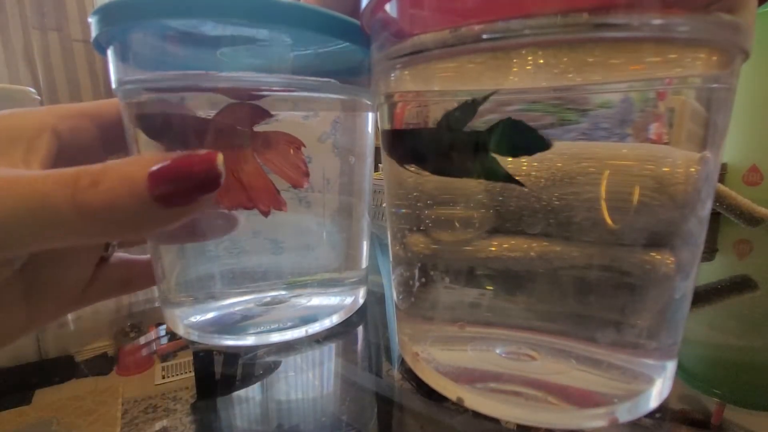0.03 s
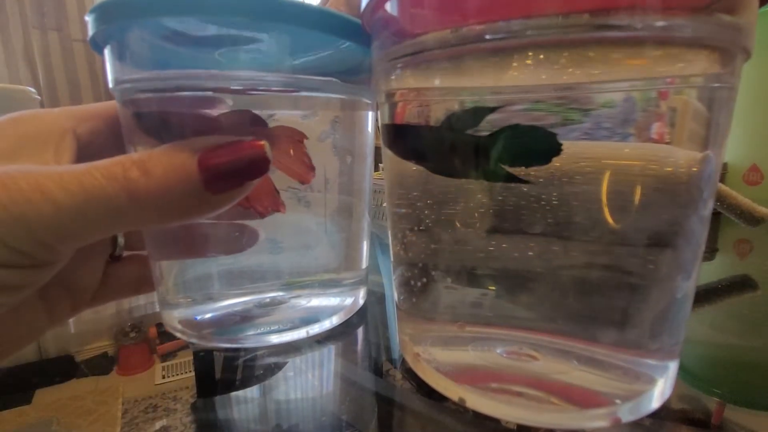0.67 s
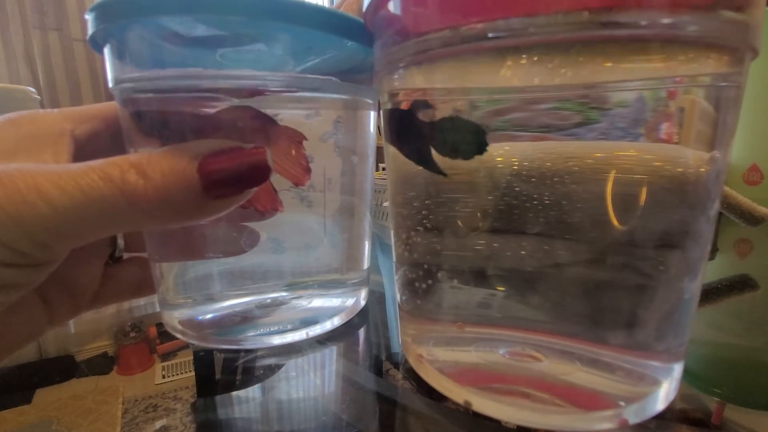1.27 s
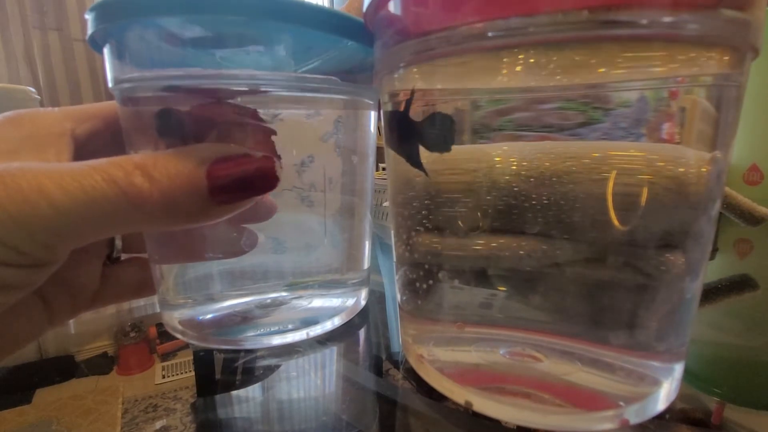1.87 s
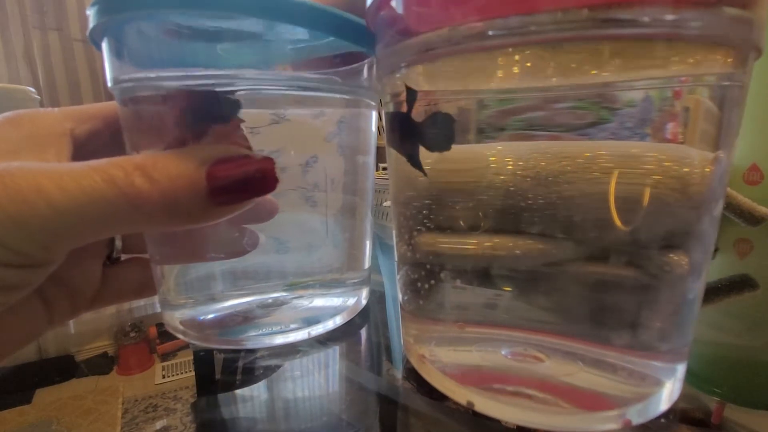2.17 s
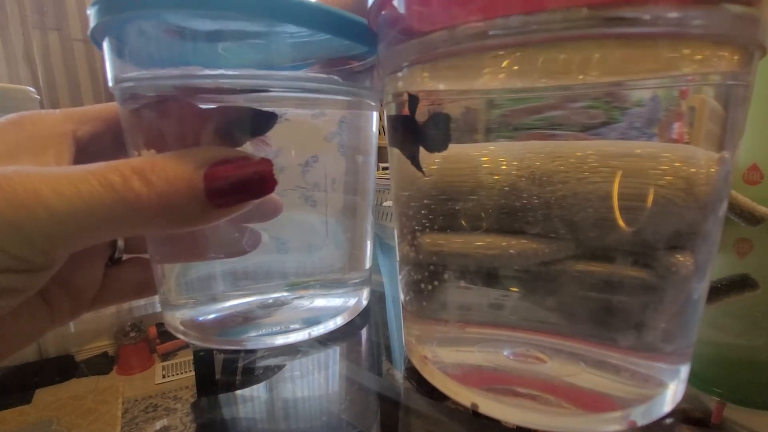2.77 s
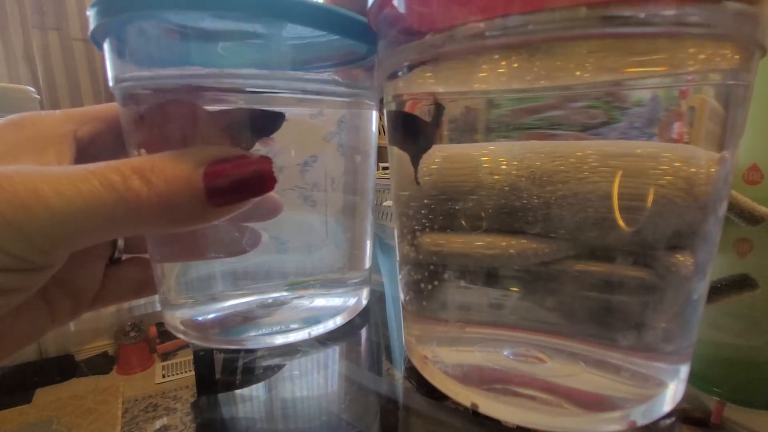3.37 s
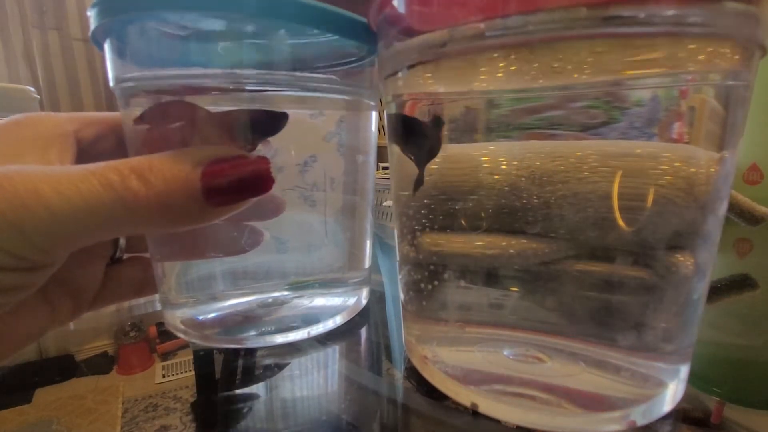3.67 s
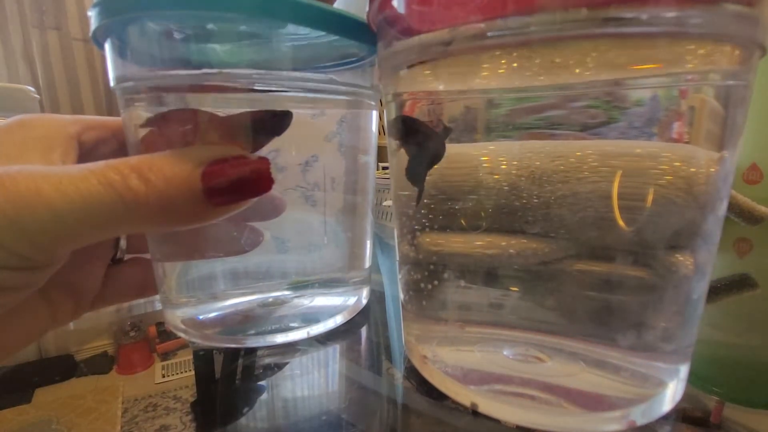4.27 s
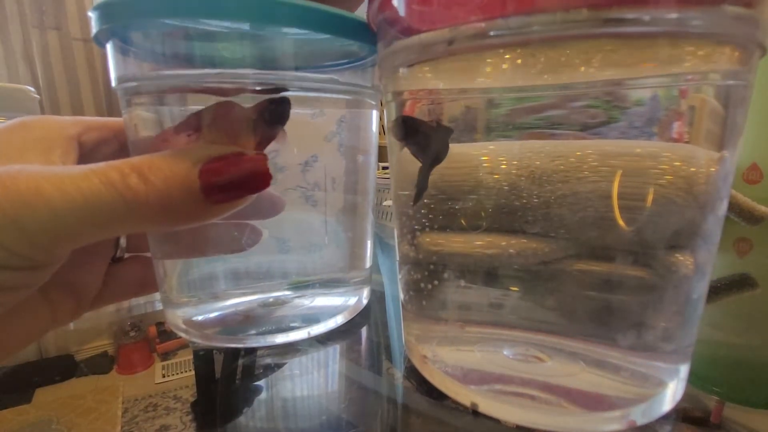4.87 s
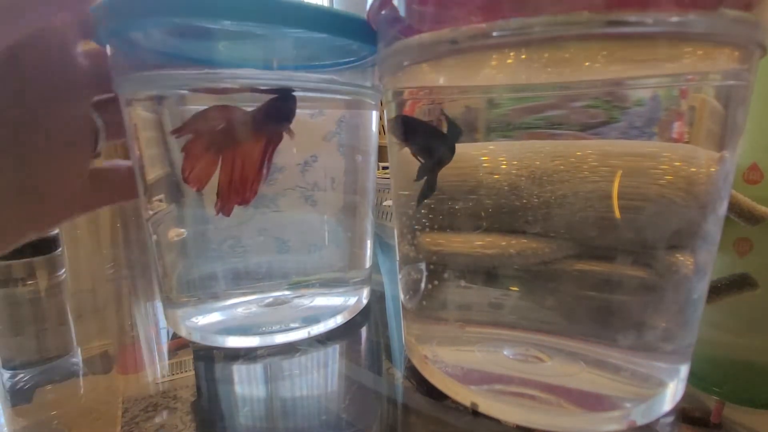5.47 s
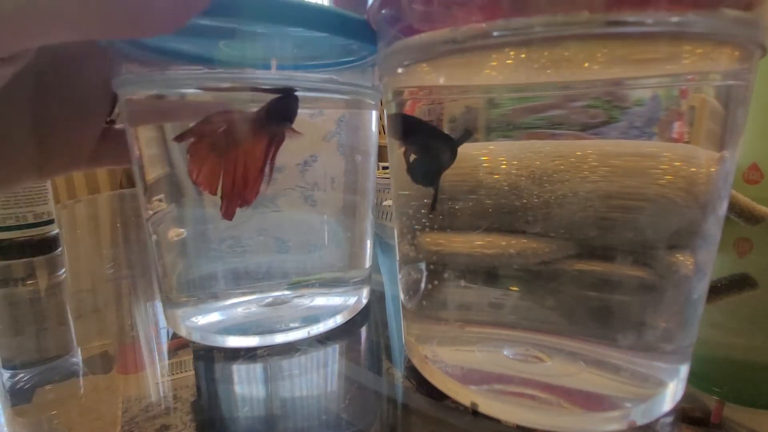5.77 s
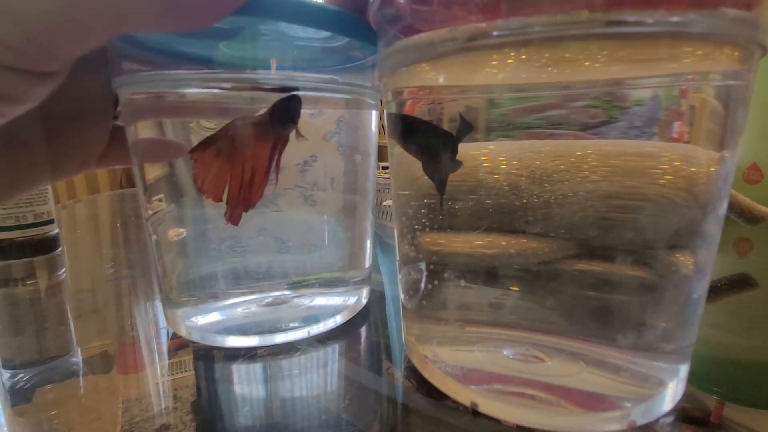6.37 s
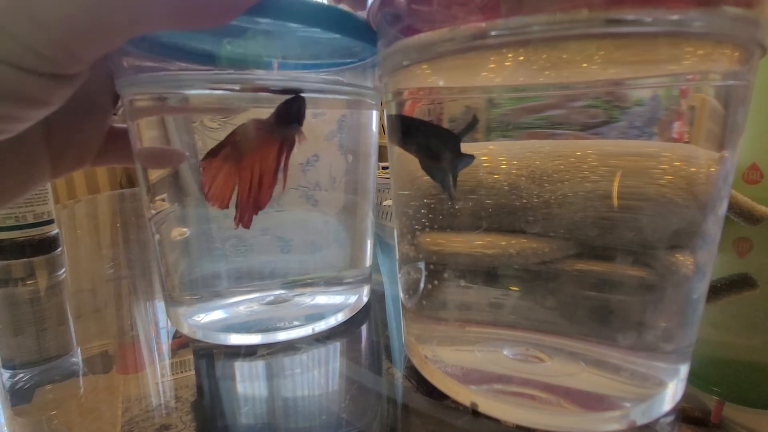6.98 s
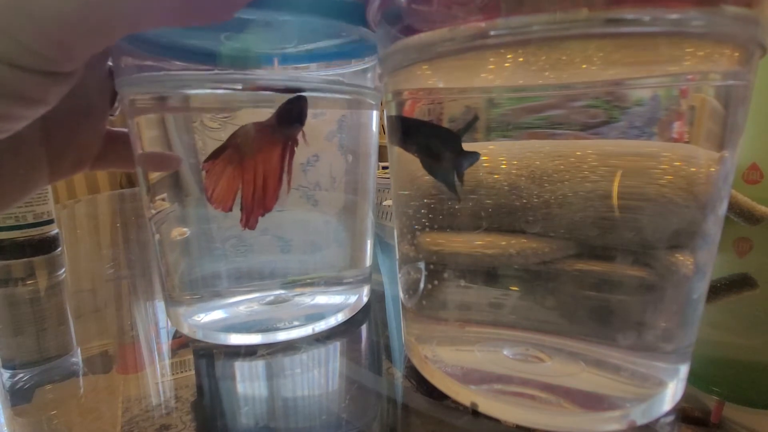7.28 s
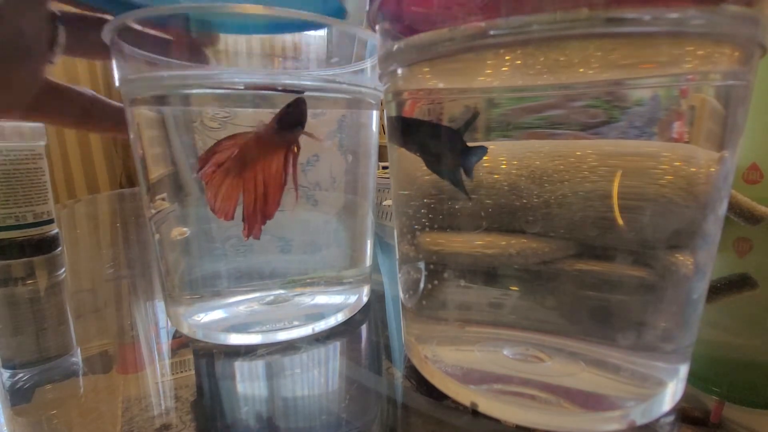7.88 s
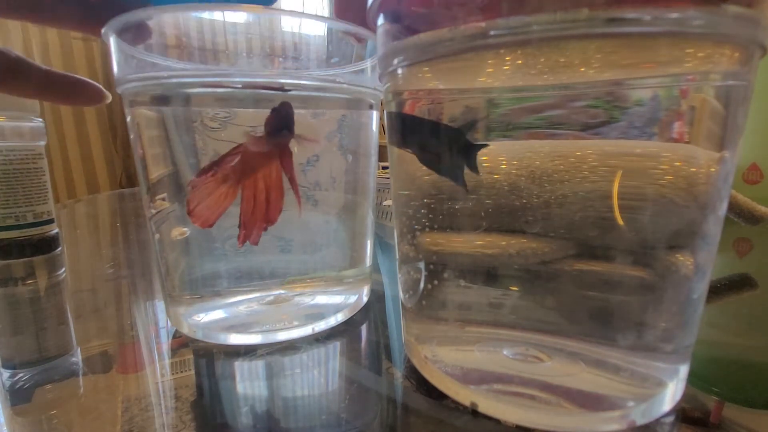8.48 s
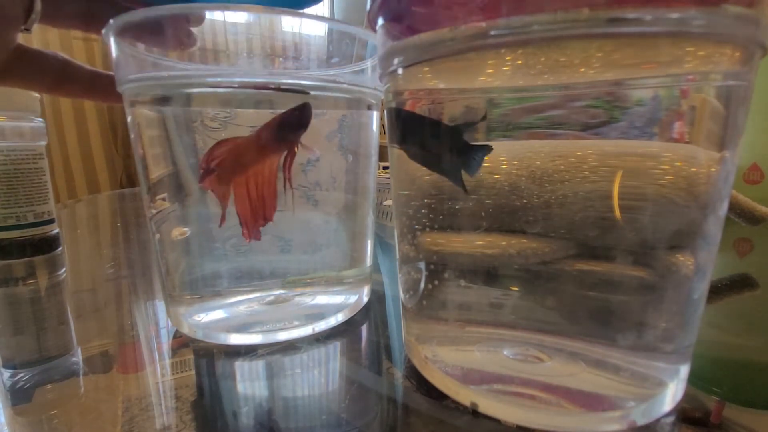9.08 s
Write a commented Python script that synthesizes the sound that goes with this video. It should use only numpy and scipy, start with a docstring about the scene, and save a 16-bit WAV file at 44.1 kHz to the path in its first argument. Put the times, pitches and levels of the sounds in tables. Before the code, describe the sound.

Soft hand rustle and a low hum, with one sharp clatter of a plastic cup on glass and light taps and hollow tocks afterward.

```python
"""Soft strokes of hand and sleeve over a steady electrical hum, with faint fingertip scuffs and squeaks.
The hand shifts a water-filled plastic cup on a glass tabletop in a small room, close to a phone.
At 2 s the cup knocks down on its edge and clatters flat, ringing its modes and the table's;
at 4.4 s it judders once. Nails and lid tick, the water-backed wall flexes in hollow tocks.
The rustle drops as the hand lets go near 6 s; then fingers rub the lid loose."""
import sys
import numpy as np
from scipy import signal
from scipy.fft import rfft, irfft, next_fast_len
from scipy.io import wavfile
from scipy.ndimage import uniform_filter1d

SR = 44100
rng = np.random.default_rng(int(sys.argv[2]) if len(sys.argv) > 2 else 0)


def generate_wav(signal):
    """Clip the signal to [-1, 1] and save it as 16-bit WAV at the path in sys.argv[1]."""
    frames = np.transpose(np.atleast_2d(signal))
    scaled = np.clip(frames, -1, 1) * 32767
    pcm = np.round(scaled).astype(np.int16)
    wavfile.write(sys.argv[1], SR, pcm)


N = 403074
TIME_S = np.arange(N) / SR
RING_S = np.arange(16384) / SR
LEFT_RIGHT = np.array([[.5], [-.5]])  # splits a left-minus-right value such as pan_db


def undb(db):
    """Decibels to gain."""
    return 10 ** (np.asarray(db) / 20)


def along(points, hz):
    """Interpolate (freq_hz, value) points on a log-frequency axis."""
    freq_hz, value = np.transpose(points)
    return np.interp(np.log(hz + 1e-3), np.log(freq_hz), value)


def filtered(x, response):
    """Filter by a gain given as a function of Hz."""
    size = next_fast_len(x.shape[-1] + 4096, True)
    hz = np.arange(size // 2 + 1) * SR / size
    return irfft(rfft(x, size) * response(hz), size)[..., :x.shape[-1]]


def unit(x):
    """Scale to rms 1."""
    return x / np.sqrt(np.mean(x ** 2))


def slow_noise(window_samples, shape=N):
    """Moving-average noise, rms 1."""
    return unit(uniform_filter1d(rng.standard_normal(shape), size=window_samples))


def add(track, start_s, sound):
    """Mix a sound into a track."""
    start = int(start_s * SR)
    part = sound[..., :N - start]
    track[..., start:start + part.shape[-1]] += part


def ring(hz, width_hz, db):
    """Decaying modes after a unit blow; db is the gain at resonance."""
    hz, width_hz, db = (np.asarray(column)[:, None] for column in (hz, width_hz, db))
    decay = undb(db) * 2 * np.pi * width_hz / SR * np.exp(-np.pi * width_hz * RING_S)
    modes = decay * np.cos(2 * np.pi * hz * RING_S)
    return np.heaviside(RING_S, .5) * modes.sum(axis=0)


def ports(x):
    """Sound from the cup reaches the left microphone port first."""
    # phase lead of the left port: freq_hz, lead_rad
    port_lead = [(0, 1.3), (400, 2.1), (700, 2.2), (1150, 2.5), (1750, 3.5), (2300, 5.5), (4000, 10.6),
                 (16000, 43)]
    left, right = np.broadcast_to(x, (2, x.shape[-1]))
    late_right = filtered(right, lambda f: np.exp(-1j * np.interp(f, *np.transpose(port_lead))))
    return np.array([left, late_right])


def diffuse(spectrum, alike_hz, direct):
    """Stereo noise: alike in the bass, partly from the cup's direction, otherwise unrelated."""
    noise = rng.standard_normal((4, N))
    bass = filtered(noise[2], lambda f: 1 / (1 + (f / alike_hz) ** 2))
    field = noise[:2] + bass + direct * ports(noise[3])
    return unit(filtered(field, lambda f: undb(along(spectrum, f))))


def swell(start_s, length_s, rise_share=0.41, curve=0.79):
    """Envelope of a slide: speeds up from rest, slows to rest."""
    angle = np.interp(TIME_S, start_s + length_s * np.array([0, rise_share, 1]), [0, np.pi / 2, 0])
    return np.sin(angle) ** curve


def cup_ring(flatness, contact_hz, grip_width_hz=28, low_cut_hz=110):
    """Cup modes, struck on edge (flatness 0) to flat (1); a soft contact rolls off the high ones."""
    # cup modes: freq_hz, width_hz, edge_db, flat_db, pan_db
    cup_modes = [(284, 230, -10, -3, 7), (411, 22, 15.5, 21, 2), (484.1, 65, 23, 23, -6),
                 (636, 76, 11, 21, 12), (704, 40, 17, 23, -6), (794, 90, 27, 20, -2.5),
                 (898, 90, 6, 33, 2.5), (1060, 130, 27, 30, 1.5), (1150, 130, 28, 33, 1.5),
                 (1335, 90, 17, 20, -3.5), (1790, 135, 33.5, 28.5, -4.5), (1960, 180, 15, 25, 3),
                 (2333, 55, 10, 34, -0.5), (2490.6, 60, 17, 34, -2.5), (2780, 60, 15, 21, -6),
                 (3020, 150, 21, 27, 8), (4000, 200, 21, 19, 4), (4313, 90, 21, 13, 6.5),
                 (4700, 219, 8, 17, 6), (5280, 230, 14, 19, 9), (5850, 700, 12, 20.5, 11),
                 (6270, 120, 24, 24, 4), (6660, 130, 20, 31.5, 5), (7700, 430, 18, 5, -3)]
    hz, width_hz, edge_db, flat_db, pan_db = np.transpose(cup_modes)
    width_hz = np.maximum(width_hz, grip_width_hz)  # the hand damps the cup
    stereo_db = edge_db + flatness * (flat_db - edge_db) + LEFT_RIGHT * pan_db
    modes = np.array([ring(hz, width_hz, side_db) for side_db in stereo_db])
    return ports(filtered(modes, lambda f: 1j * f / (low_cut_hz + 1j * f) / (1 + 1j * f / contact_hz)))


def hand_levels(let_go_s=5.92, release_s=1):
    """Gains of hiss, rub and ring: strokes add power to a resting hand that is never quite still."""
    # hand and sleeve strokes: start_s, length_s, hiss_db, rub_db, ring_db
    strokes = [(-.15, 0.38, -72.5, -74, -72), (0.081, 0.43, -71.5, -68, -66.5),
               (0.355, 0.46, -76, -72.5, -70.5), (1.015, 0.25, -77.5, -88, -80),
               (1.247, 1.0, -76.5, -81.5, -71), (2.531, 0.61, -74, -73, -69.5),
               (3.048, 1, -75.5, -73.5, -75.5), (3.546, 0.59, -64, -70, -72), (4.0, 0.74, -80.5, -96, -77),
               (4.6, 1, -74.5, -75, -78), (4.964, 0.46, -68.5, -67, -69.5), (5.229, 0.45, -71, -73.5, -80),
               (5.494, 0.4, -81.5, -73.5, -74), (5.785, 0.2, -92.5, -78, -83.5),
               (6.159, 0.2, -76, -81, -70.5), (6.299, 0.43, -87.5, -88, -86),
               (6.773, 0.61, -78.5, -76.5, -79), (7.308, 0.24, -77.5, -71.5, -82),
               (7.56, 0.42, -84, -81.5, -85), (7.8, 0.55, -81, -84, -91), (8.7, 0.73, -85.5, -85.5, -87)]
    grip_db, loose_db = (-79, -76.5, -82), (-87.5, -80.5, -92)  # at rest: hiss, rub, ring
    grip = np.interp(TIME_S, [let_go_s, let_go_s + release_s], [1, 0])
    power = undb(np.outer(grip_db, grip) + np.outer(loose_db, 1 - grip)) ** 2
    for start_s, length_s, *levels_db in strokes:
        power = power + np.outer(undb(levels_db), swell(start_s, length_s)) ** 2
    return np.sqrt(power)


def rustle(hiss_trim_db=4, rub_trim_db=2.5, ring_trim_db=-5, grain_db=1.0, skin_hz=1500):
    """Sliding skin and cloth: grainy hiss, dull rubbing, and friction ringing the cup's higher modes."""
    # hiss spectrum: freq_hz, density_db
    hiss_spectrum = [(500, -14), (1300, -2.5), (2500, -3), (4500, -2), (8000, -0.5), (9000, -8.5),
                     (12000, -9), (16000, -13)]
    # rubbing spectrum: freq_hz, density_db
    rub_spectrum = [(30, -9), (70, 1.5), (130, -2.5), (220, -4), (480, 4.5), (650, -1), (850, 0),
                    (1200, -7), (2000, -15.5), (4000, -38.5)]
    hiss_gain, rub_gain, ring_gain = hand_levels()
    grain = undb(grain_db * slow_noise(400))
    friction = filtered(rng.standard_normal(N), lambda f: f / np.hypot(f, skin_hz))
    cup = cup_ring(0.71, contact_hz=3996)
    ringing = undb(ring_trim_db) * unit(signal.oaconvolve(friction[None], cup, axes=1)[:, :N])
    hiss = undb(hiss_trim_db) * diffuse(hiss_spectrum, alike_hz=199.9, direct=0.037)
    rub = undb(rub_trim_db) * diffuse(rub_spectrum, alike_hz=248.0, direct=1.0)
    return grain * (hiss_gain * hiss + rub_gain * rub + ring_gain * ringing)


def hum():
    """Two wavering appliance tones standing in the room."""
    # hum tones: pitch_hz, level_db, waver_re_tone_db, waver_width_hz, pan_db, left_lead_rad
    tones = [(119.7, -78.5, -6.5, 28, 6, 0.059), (385.4, -65, -16.5, 69, -2, 1.67)]
    out = 0
    for hz, db, waver_db, width_hz, pan_db, lead_rad in tones:
        noise = rng.standard_normal((2, N))
        waver = undb(waver_db) * unit(filtered(noise, lambda f: 1 / (1 + (f / width_hz) ** 2)))
        tone = (np.sqrt(2) + waver[0] + 1j * waver[1]) * np.exp(2j * np.pi * hz * TIME_S)
        out = out + undb(db + LEFT_RIGHT * pan_db) * np.real(tone * np.exp(1j * lead_rad * LEFT_RIGHT))
    return out


def room_air(level_db=-78):
    """Faint, steady, mostly low noise of the room."""
    # air spectrum: freq_hz, density_db
    air_spectrum = [(20, -4.5), (70, -1.5), (130, -7.5), (220, -16), (330, 3), (600, -11.5), (900, -12.5),
                    (1500, -15), (3000, -20.5), (8000, -27), (9500, -36), (16000, -32.5)]
    return undb(level_db) * diffuse(air_spectrum, alike_hz=250, direct=0.19)


def flex(hz, swell_ms, steepness=2.6, scrape=0.02):
    """A soft push on the cup wall swells and dies within a few cycles; slower is rougher."""
    t_s = RING_S[:2048]
    age = 1000 * t_s / swell_ms
    envelope = (age * np.exp(1 - age)) ** steepness
    drift = np.cumsum(uniform_filter1d(rng.standard_normal(len(t_s)), size=24))
    slip_rad = scrape * swell_ms ** 2 / 2 * drift
    return envelope * np.sin(2 * np.pi * hz * t_s + slip_rad)


def scuffs(slips_per_s=380, swell_ms=1.24, pitch_spread=0.15, spread_db=3, pan_db=2.5):
    """The wall sticks and slips under a finger: tiny uneven pushes, strongest mid-drag."""
    # finger drags: start_s, length_s, level_db, pitch_hz
    drags = [(0.168, 0.28, -56.5, 453), (3.823, 0.083, -53, 900), (3.929, 0.095, -52.5, 893),
             (4.438, .06, -49, 815), (4.698, 0.06, -55.5, 851), (5.006, 0.075, -55, 654),
             (5.559, 0.064, -50, 829), (5.615, 0.075, -45, 1020), (5.732, 0.067, -56, 854),
             (6.003, 0.34, -71.5, 791), (6.355, .055, -60.5, 850), (6.792, 0.062, -55.5, 790),
             (7.182, 0.021, -56, 1060), (7.319, .11, -61.5, 1150), (8.547, 0.06, -63, 901),
             (8.752, 0.055, -60.5, 852), (8.918, 0.071, -66, 907)]
    out = np.zeros(N)
    for start_s, length_s, db, hz in drags:
        slips = max(int(length_s * slips_per_s), 1)
        for k in range(slips):
            progress = (k + rng.random()) / slips
            size, detune = rng.standard_normal(2)
            gain = undb(db + spread_db * size) * np.sin(np.pi * progress)
            push = flex(hz * np.exp(pitch_spread * detune), swell_ms)
            add(out, start_s + progress * length_s, gain * push)
    return undb(LEFT_RIGHT * pan_db) * ports(out)


def squeaks(pitch_jitter=.005, flutter_db=.8):
    """A fingertip sticks and slips on the wall: short, slightly unsteady tones."""
    # fingertip slips: start_s, length_s, level_db, pitch_hz
    slips = [(.18, .07, -69.5, 3080), (.467, .021, -54, 1675), (.487, .016, -47, 1685),
             (.506, .026, -44.5, 1715), (.538, .025, -51, 1700), (.56, .04, -63, 1700),
             (6.19, .1, -79, 2790)]
    jitter, flutter = slow_noise(500, shape=(2, N))
    rad_per_hz = 2 * np.pi * np.cumsum(1 + pitch_jitter * jitter) / SR
    tones = sum(undb(db) * swell(start_s, length_s) * np.sin(hz * rad_per_hz)
                for start_s, length_s, db, hz in slips)
    return ports(undb(flutter_db * flutter) * tones)


def burst(decay_ms, response, rise_ms=0.51, alike_hz=2000):
    """Dense, fast-dying high modes of thin plastic: unit energy, treble unlike at each port."""
    t_ms = 1000 * RING_S[:2048]
    envelope = np.exp(-t_ms / decay_ms) * (1 - np.exp(-t_ms / rise_ms))
    noise = filtered(rng.standard_normal((3, len(t_ms))) * envelope, response)
    bass = ports(filtered(noise[2], lambda f: alike_hz ** 2 / np.hypot(f ** 2, alike_hz ** 2)))
    treble = filtered(noise[:2], lambda f: f ** 2 / np.hypot(f ** 2, alike_hz ** 2))
    both = bass + treble
    return both / np.sqrt(np.sum(both ** 2, axis=1, keepdims=True))


def knocks(crack_ms=1.3, treble_pan_db=5, shade_hz=3000):
    """The cup meets the glass: each contact cracks and rings the cup."""
    # contacts: start_s, blow_db, flatness, contact_hz, crack_db
    contacts = [(2.0616, -10.5, 0, 16000, -0.5), (2.0624, -10, 0.12, 1210, 0.5), (2.0652, -8.5, 0, 440, -7),
                (2.11618, -13.5, 0.56, 5950, 1.5), (2.11811, -5.5, 0.16, 875, -11),
                (2.12024, -12, 0.51, 10500, 3.5), (2.12202, -0.7, 0.97, 1250, -1.4),
                (2.12499, -14.5, 0.48, 540, -8), (2.13415, -19, 0.18, 735, -13.5),
                (2.14194, -23, 0.61, 980, -25)]
    # crack spectrum of stiff plastic: freq_hz, level_db
    crack_spectrum = [(100, -24), (300, -12), (600, 2.5), (1100, 5), (1500, -6), (2600, -2), (3450, -8.5),
                      (4200, -9), (7000, -7), (9000, -16.5), (12000, -14.5), (16000, -21)]
    out = np.zeros((2, N))
    for start_s, blow_db, flatness, contact_hz, crack_db in contacts:
        add(out, start_s, undb(blow_db) * cup_ring(flatness, contact_hz))
        crack = burst(crack_ms, lambda f: undb(along(crack_spectrum, f)))
        crack = filtered(crack, lambda f: undb(crack_db + LEFT_RIGHT * treble_pan_db * f / (f + shade_hz)))
        add(out, start_s, crack)
    return out


def table_boom(band_hz=(50, 280), pan_db=-4):
    """The cup's weight bumps the table and rings its low modes."""
    # bumps: start_s, blow_db
    bumps = [(2.065, -3.5), (2.119, -6.5), (2.147, -6), (2.709, -25), (3.677, -28), (4.4235, -14),
             (4.438, -11.5), (4.452, -12.5), (4.563, -31), (5.6, -21), (5.664, -20), (6.85, -31)]
    # table modes: freq_hz, width_hz, gain_db
    table_modes = [(57, 8, 10), (72, 7.2, 17), (98, 16, 7), (134, 27, 7), (182, 18, 6)]
    out = np.zeros(N)
    boom = ring(*np.transpose(table_modes))
    for start_s, blow_db in bumps:
        add(out, start_s, undb(blow_db) * boom)
    # water cushions the push; the small top radiates little deep bass
    out = signal.sosfilt(signal.butter(2, band_hz, "bandpass", fs=SR, output="sos"), out)
    return undb(LEFT_RIGHT * pan_db) * out


def tocks(rebound_s=.0036, pan_db=3.0):
    """The water-backed wall flexes with a hollow tock, then mostly springs back with a weaker one."""
    # pushes on the wall: start_s, level_db, pitch_hz, swell_ms, rebound_share
    pushes = [(2.1203, -6.5, 1082, 2.1, 0.43), (2.1226, -11, 690, 3.16, 0.39),
              (2.3815, -34, 1110, 0.85, 0.94), (2.552, -49.5, 523, 2.05, 0.046),
              (3.943, -44.5, 832, 2.84, 0.27), (4.422, -31, 1150, 1.4, 0.022),
              (4.4254, -29, 825, 1.9, 0.29), (4.4246, -37, 375, 3.8, 0.21),
              (4.4307, -27.5, 536, 3.9, 0.046), (4.4372, -23.5, 790, 1.03, 0.51),
              (4.583, -45, 870, 1.2, 0.016), (4.597, -46, 960, 1.5, 0.35), (5.2292, -42.5, 619, 1.5, 0),
              (5.665, -39.5, 858.5, 3.03, 0.056), (6.378, -52.5, 850.5, 1.8, 0.46),
              (6.8215, -46, 788.5, 1.38, 0.43), (7.0215, -41, 840, 1.2, 0), (7.062, -48, 976, 1.8, 0.04),
              (7.2062, -39.5, 1083, 2.56, 0.037), (7.3056, -31.5, 1125, 1.82, 0),
              (7.3108, -37, 1199, 1.56, 0), (7.4842, -33.5, 1175, 1.9, 0.54),
              (7.505, -47, 681.7, 3.23, 0.032), (8.793, -51, 1097, 1.9, 0.23)]
    out = np.zeros(N)
    for start_s, db, hz, swell_ms, rebound_share in pushes:
        add(out, start_s, undb(db) * flex(hz, swell_ms))
        add(out, start_s + rebound_s, rebound_share * undb(db) * flex(hz, swell_ms))
    return undb(LEFT_RIGHT * pan_db) * ports(out)


def ticks(unit_q_ms=1.0, ring_db=-24):
    """Nails and lid tick on the plastic, barely ringing the cup; longer ticks have narrower bands."""
    # light contacts: start_s, level_db, centre_hz, decay_ms, pan_db
    taps = [(2.238, -33.5, 8100, 2, 3), (2.3802, -33, 2300, 2.7, -3), (2.552, -34.5, 4890, 2.13, 4.5),
            (2.6228, -37, 3987, 1.36, 8), (3.024, -32, 13320, 1.27, -1), (3.446, -34, 5830, 0.99, 7.5),
            (3.8737, -26, 6360, 3.6, 4), (3.876, -34, 2400, 8.9, -4), (3.992, -35.5, 2320, 14, -1),
            (4.4181, -26, 1960, 5.2, 7.5), (4.421, -30, 3290, 1.7, 6), (4.428, -30.5, 2660, 8.3, 6),
            (4.4837, -38, 4904, 3.13, 7), (6.821, -41.5, 6000, 2.2, 5), (7.0215, -29, 6100, 1.5, 7),
            (7.028, -37, 6200, 5, 2), (7.0622, -33.5, 6000, 1.2, 6), (7.087, -44, 7000, 1.9, 5),
            (7.206, -40.5, 2775, 12, 7), (7.306, -45.5, 3300, 3.26, 10), (7.483, -47.5, 3020, 2.3, 6),
            (7.554, -42.5, 7870, 7.8, 9.5), (7.9, -50, 4405, 3.6, 8)]
    out = np.zeros((2, N))
    ringing = undb(ring_db) * cup_ring(0.98, contact_hz=5000)
    for start_s, db, hz, decay_ms, pan_db in taps:
        gain = undb(db + LEFT_RIGHT * pan_db)
        q = decay_ms / unit_q_ms
        tick = burst(decay_ms, lambda f: 1j * f * hz / (q * (hz ** 2 - f ** 2) + 1j * f * hz))
        add(out, start_s, gain * tick)
        add(out, start_s, gain * ringing)
    return out


def swish(peak_s=5.378, spread_s=0.04, level_db=-60, low_cut_hz=8000):
    """Fingers brush past the lid: a brief, fine hiss."""
    hiss = unit(filtered(rng.standard_normal((2, N)), lambda f: f ** 3 / (f ** 3 + low_cut_hz ** 3)))
    return undb(level_db) * np.exp(-((TIME_S - peak_s) / spread_s) ** 2) * hiss


def lid_rubs(grain_db=3.0, pan_db=3.0):
    """Fingers slide the lid off the rim; grainy friction rings it."""
    # slides along the rim: start_s, length_s, level_db
    slides = [(6.99, .13, -77), (7.371, 0.087, -78), (7.538, 0.1, -80), (7.85, 0.38, -89)]
    # lid modes: freq_hz, width_hz, gain_db
    lid_modes = [(2160, 220, 2), (2804, 200, -4), (4790, 200, -4), (6400, 400, -5)]
    friction = undb(grain_db * slow_noise(200)) * rng.standard_normal(N)
    ringing = unit(signal.oaconvolve(friction, ring(*np.transpose(lid_modes)))[:N])
    envelope = sum(undb(db) * swell(start_s, length_s) for start_s, length_s, db in slides)
    return undb(LEFT_RIGHT * pan_db) * ports(ringing * envelope)


def room_echo(x, onset_s=0.0042):
    """Short, dense echo from the table and near walls; treble dies first."""
    # echo decay: freq_hz, t60_s
    decays = [(100, .3), (500, .17), (1100, .16), (2500, .15), (6000, .125), (12000, .115)]
    # echo colour: freq_hz, gain_db
    colour = [(100, -5.5), (500, -10), (1100, -16), (2500, -7), (6000, -11.5), (12000, -7.5)]
    noise = rng.standard_normal((2, len(RING_S)))
    echo = 0
    for band_hz, t60_s in decays:
        share = [(hz, hz == band_hz) for hz, _ in decays]
        band = filtered(noise, lambda f: along(share, f) * undb(along(colour, f)))
        fade = undb(-60 * RING_S / t60_s) * (1 - np.exp(-(RING_S / onset_s) ** 2))
        echo = echo + band * fade / np.sqrt(np.sum(fade ** 2))
    return signal.oaconvolve(x, echo, axes=1)[:, :N]


def scene(handling_send_db=-3):
    """Cup sounds with their echo, over rustle, hum and room air."""
    impacts = knocks() + table_boom()
    handling = ticks() + tocks() + scuffs() + squeaks() + lid_rubs()
    air = room_air()
    echo = room_echo(impacts + undb(handling_send_db) * handling)
    return impacts + handling + echo + rustle() + swish() + hum() + air


def record(dry, low_cut_hz=25, top_hz=15700):
    """The phone clips at full scale, drops the deepest bass and cuts the top."""
    highpass = signal.butter(2, low_cut_hz, "highpass", fs=SR, output="sos")
    lowpass = signal.ellip(10, .2, 70, top_hz, fs=SR, output="sos")
    return signal.sosfilt(lowpass, signal.sosfilt(highpass, np.clip(dry, -1, 1)))


dry = scene()
out = record(dry)
generate_wav(out)
```